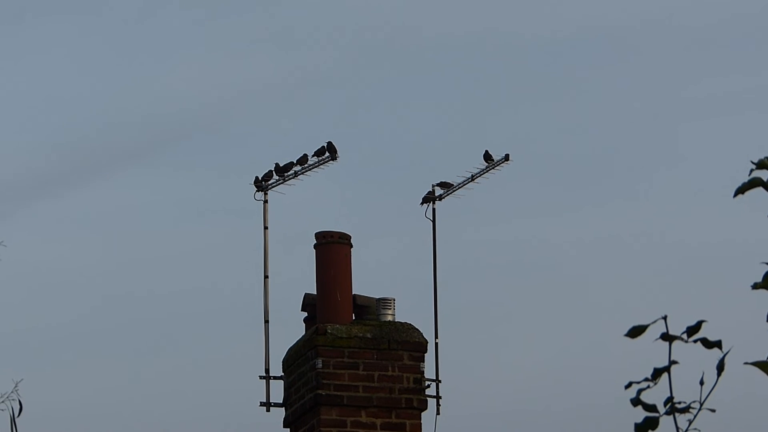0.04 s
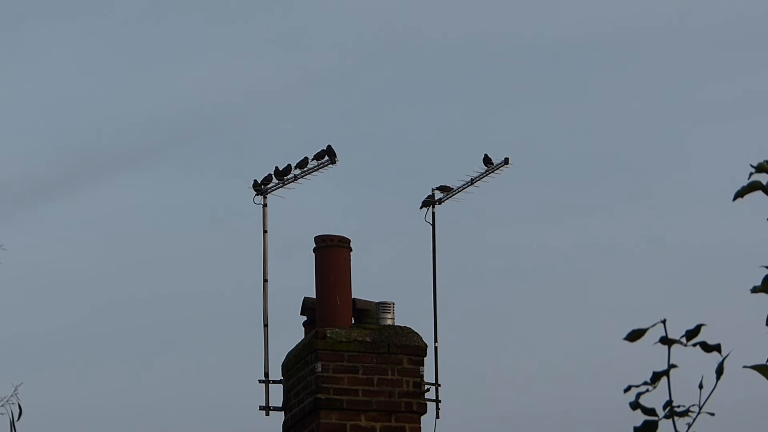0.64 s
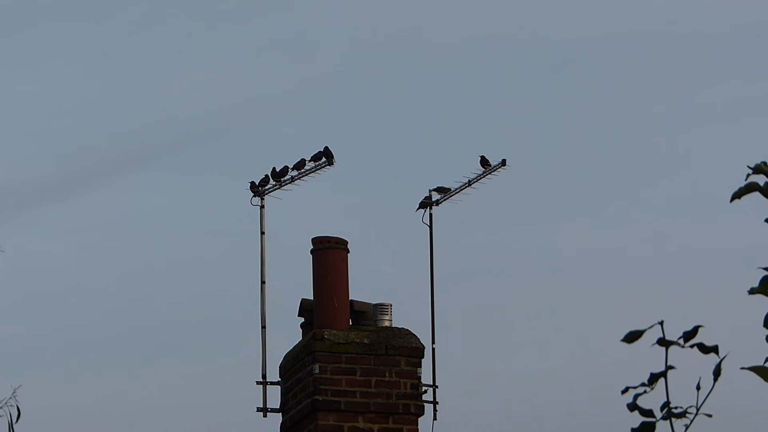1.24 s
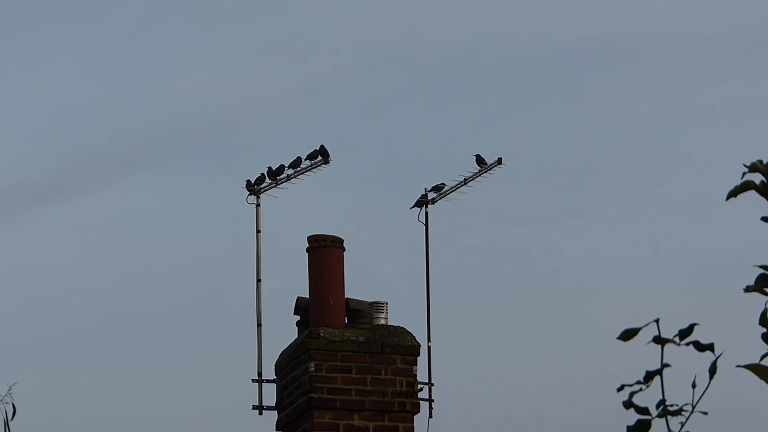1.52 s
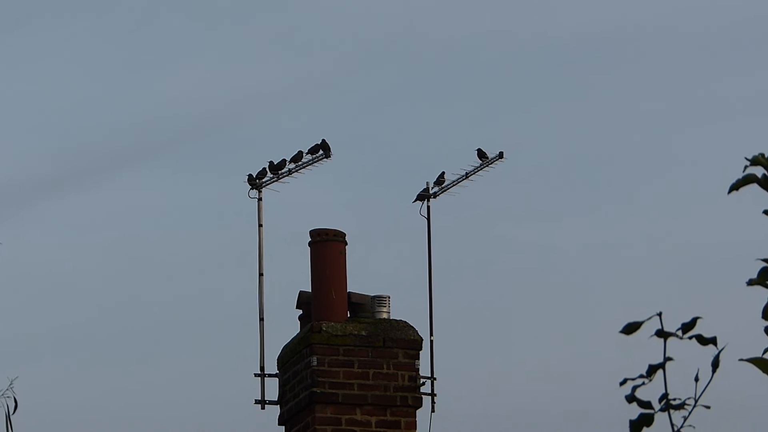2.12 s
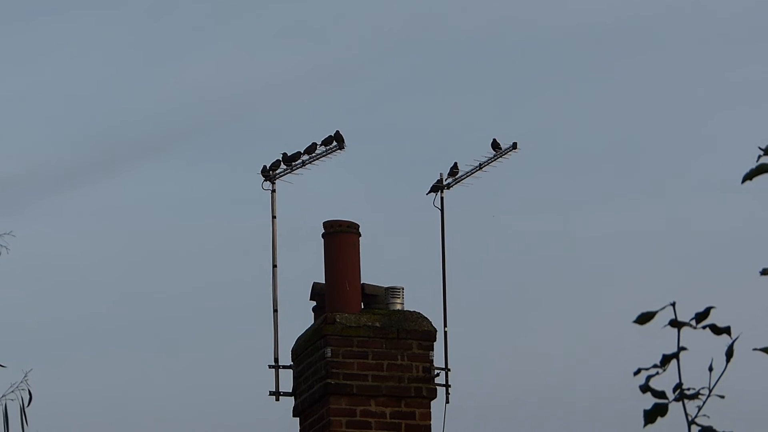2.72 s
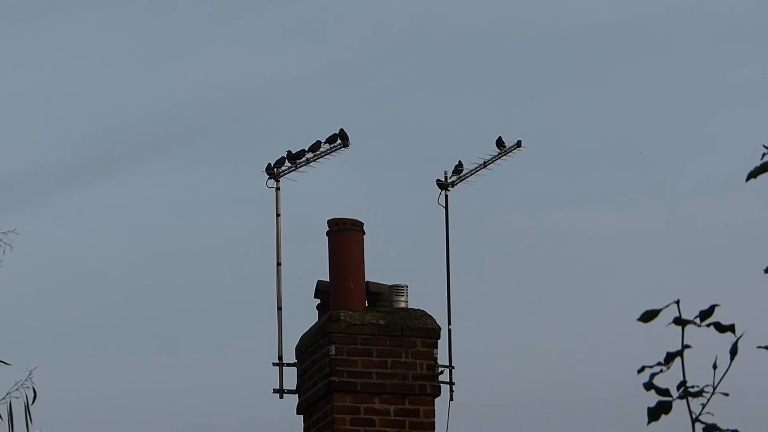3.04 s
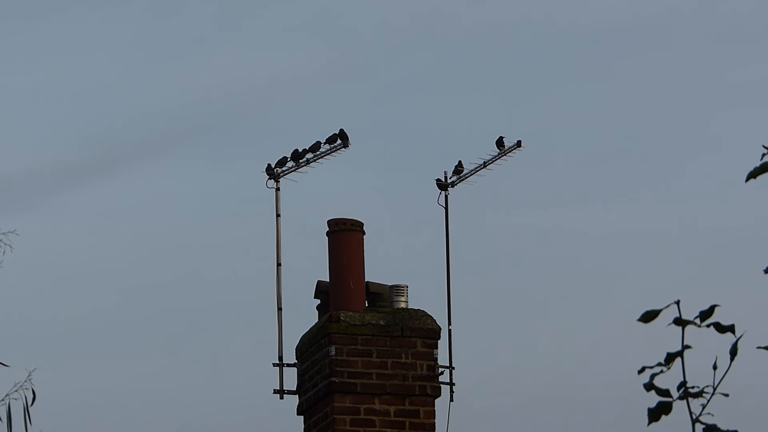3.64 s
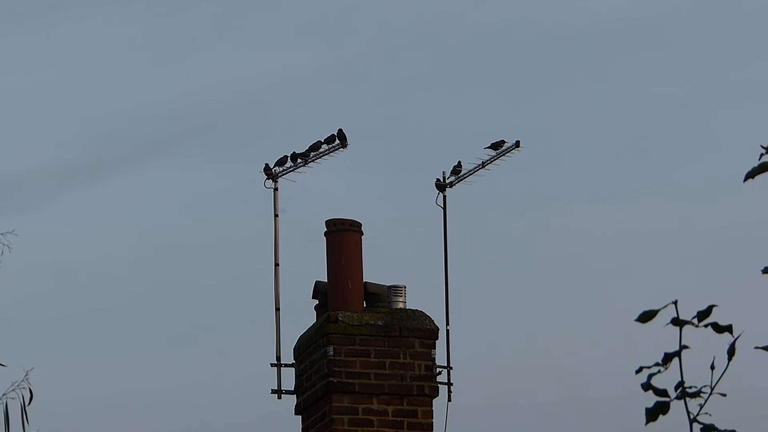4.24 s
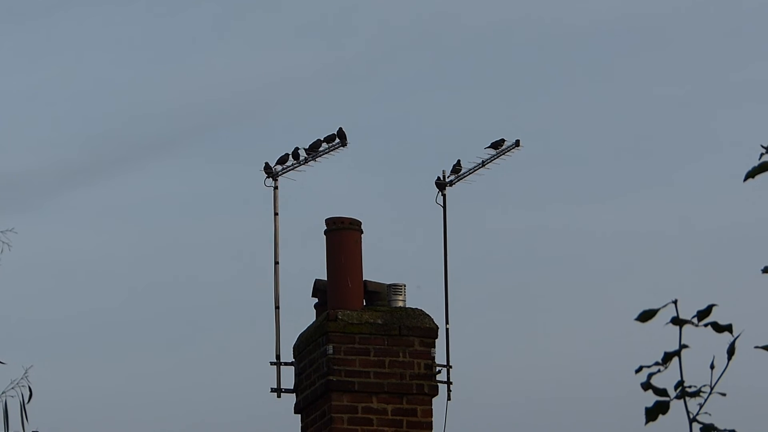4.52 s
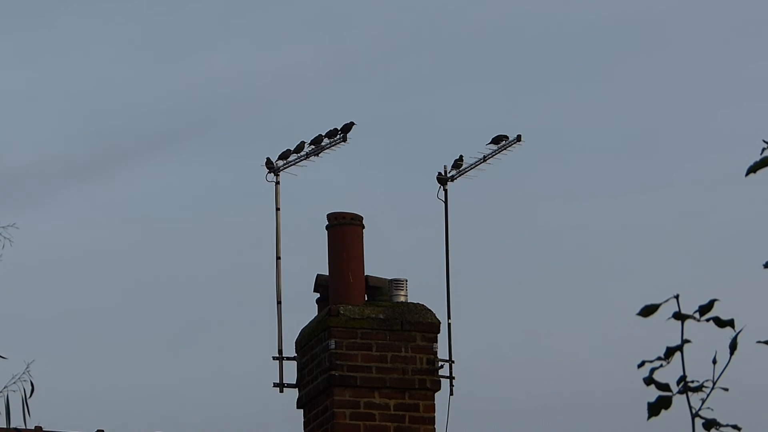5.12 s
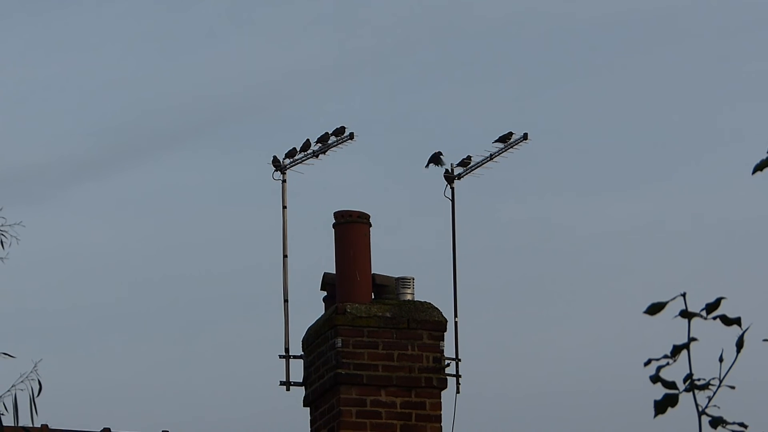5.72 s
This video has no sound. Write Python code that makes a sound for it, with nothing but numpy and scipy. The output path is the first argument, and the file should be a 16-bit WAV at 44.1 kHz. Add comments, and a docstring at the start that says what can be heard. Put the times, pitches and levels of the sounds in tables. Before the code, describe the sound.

Starlings call from a rooftop over a quiet, steady hum of distant traffic, with a soft dull tick about once a second. Around 0.5 seconds comes a quick cluster of thin, high chirps. From 1.1 to 2.2 seconds there are reedy squeaks, a faint hoarse note and a few tiny dry beak clicks, while further birds twitter and answer. At 2.3 seconds a long pure whistle swells and slides down, thinning away by 3 seconds. After another click, short harsh rasps come in an uneven run from 3.5 to 5 seconds. A high buzzy trill stands out at about 4.8 seconds, followed by a lower hoarse call at 5.1. Two more rasps and a fainter trill come between 5.3 and 5.7 seconds. The surrounding houses give the calls a short echo, heard through a small stereo microphone.

```python
"""Starlings on two rooftop aerials give thin chirps, a long falling whistle, buzzy trills and harsh rasps.
Their voice box sings nearly pure notes, or flaps unevenly so that throat and beak ring in a rasp.
Fainter birds answer from further off, and the houses around throw back a short echo.
A distant town hums underneath, with a soft dull tick once a second; a small stereo microphone hears it."""
import sys
import numpy as np
from scipy import signal
from scipy.fft import rfft, irfft
from scipy.io import wavfile
from scipy.ndimage import uniform_filter1d

SR = 44100
rng = np.random.default_rng(int(sys.argv[2]) if len(sys.argv) > 2 else 0)


def digitize_waveform(pressure):
    """Quantize a signal to 16-bit integers and store it at the path in sys.argv[1].

    Rows of a 2-D input are taken as channels; values are limited to [-1, 1].
    """
    field = np.atleast_2d(pressure).T
    bounded = np.clip(field, -1, 1)
    quanta = np.round(bounded * 32767).astype(np.int16)
    wavfile.write(sys.argv[1], SR, quanta)


N = 262836
T = np.arange(N) / SR
FREQS = np.maximum(np.arange(N // 2 + 1) * SR / N, 1)


def from_db(db):
    """Turn decibels into a number to multiply by."""
    return 10 ** (np.asarray(db) / 20)


def unit_power(x):
    """Scale a sound to an average power of 1."""
    return x / np.sqrt(np.mean(x ** 2) + 1e-20)


def over_hz(rows):
    """Fill in a table's columns for every frequency between its rows."""
    hz, *columns = np.transpose(rows)
    return [np.interp(np.log(FREQS), np.log(hz), column) for column in columns]


def colour(x, spectrum):
    """Turn frequencies up or down by a table of (frequency [Hz], gain [dB])."""
    return irfft(rfft(x) * from_db(over_hz(spectrum)[0]), N)


def drift(rate_hz):
    """A random wander of about 1 either way, changing about rate_hz times a second."""
    return unit_power(irfft(rfft(rng.standard_normal(N)) / (1 + (FREQS / rate_hz) ** 4), N))


def wobble(hz, unevenness, drift_hz):
    """A swing between -1 and 1 whose speed wanders around hz."""
    return np.sin(2 * np.pi * np.cumsum(hz * (1 + unevenness * drift(drift_hz))) / SR)


def resonate(x, hz, width_hz):
    """Ring at one pitch; filtering twice shuts out more of the rest."""
    r = np.exp(-np.pi * width_hz / SR)
    section = [(1 - r * r) / 2, 0, (r * r - 1) / 2, 1, -2 * r * np.cos(2 * np.pi * hz / SR), r * r]
    return signal.sosfilt([section, section], x + 1e-18)


def burst(start, length, rise, fall):
    """A loudness shape that swells, holds and dies away (all times in seconds)."""
    swell = (1 + np.tanh(2 * (T - start) / rise)) / 2
    return swell * np.exp(-np.clip((T - start - length) / fall, 0, 20))


def slur(start, length, from_hz, to_hz, bow_hz, db, crescendo_db=0, taper_db=7):
    """Points (time, pitch, level) of a sliding note; bow lifts its middle pitch, taper softens its ends."""
    progress = np.linspace(0, 1, 17)
    arch = 1 - (2 * progress - 1) ** 2
    hz = from_hz + (to_hz - from_hz) * progress + bow_hz * arch
    level_db = db + crescendo_db * (progress - .5) - taper_db * (1 - arch)
    return np.transpose([start + length * progress, hz, level_db])


def sing(notes, octave_db, waver, flutter_db, buzz_hz=170, buzz_depth=0, edge_s=0.004):
    """A bird's voice box makes a tone and its octave; a buzz swings the pitch quickly up and down."""
    swing = wobble(buzz_hz, unevenness=0.11, drift_hz=51.1)
    bend = 1 + waver * drift(262) + buzz_depth * swing
    flutter = flutter_db * drift(55)
    out = np.zeros(N)
    for note in notes:
        times, hz, db = np.transpose(note)
        on = (T > times[0] - edge_s) & (T < times[-1] + edge_s)
        t = T[on]
        phase = 2 * np.pi * np.cumsum(np.interp(t, times, hz) * bend[on]) / SR
        tone = np.sin(phase) + from_db(octave_db) * np.sin(2 * phase)
        inside_s = np.minimum(t - times[0], times[-1] - t)
        fade = np.sin(np.pi / 2 * np.clip(inside_s / (2 * edge_s) + .5, 0, 1)) ** 2
        out[on] += np.sqrt(2) * fade * from_db(np.interp(t, times, db) + flutter[on]) * tone
    return out


def town(gain_db=1.0, hum_hz=201, hum_db=-21):
    """Far traffic with a faint hum, partly different at the two ears."""
    # the traffic's tone colour: (frequency [Hz], relative level [dB])
    spectrum = [(20, -5.5), (45, -7.5), (70, -6.5), (125, -2.5), (250, -2), (370, -4.5), (760, 0.5),
                (1100, -1), (1550, -4.5), (2700, -11), (4500, -14), (7000, -14), (10000, -20),
                (15500, -28.5)]
    # its slow change in loudness: (time [s], level before gain_db [dB])
    loudness = [(0.3, -63.5), (1.7, -62), (5.96, -62.5)]
    # the share that differs between the ears: (frequency [Hz], gain [dB])
    ear_difference = [(30, -14), (80, -12), (250, 0.5), (1000, -4), (3000, -3.5), (6000, -4.5), (14000, -3)]
    mid, side = (unit_power(colour(rng.standard_normal(N), spectrum)) for _ in range(2))
    hum = from_db(hum_db) * unit_power(resonate(rng.standard_normal(N), hum_hz, width_hz=14.0))
    level = from_db(np.interp(T, *np.transpose(loudness)) + gain_db)
    return level * (mid + hum + colour(side, ear_difference) * [[1], [-1]])


def ticks(first_s=.862, every_s=1.0004, level_db=-56.5):
    """A soft, blurred knock of noise that comes once a second."""
    # the knock's tone colour: (frequency [Hz], relative level [dB])
    spectrum = [(300, -19), (700, -6.5), (1150, 3), (1600, -4.5), (2800, -9.5), (6000, -15.5), (12000, -39)]
    knocks = sum(burst(s, length=0.022, rise=0.0053, fall=0.04) for s in np.arange(first_s, T[-1], every_s))
    return from_db(level_db) * knocks * unit_power(colour(rng.standard_normal(N), spectrum))


def rooftops(x, echo_db, decay_s, gap_s=0.0041, stereo_width=0.38):
    """Sound bounces back: many scattered echoes from roofs and two clearer ones from walls."""
    # single echoes from houses: (delay [s], gain [dB])
    walls = [(0.073, -24.5), (0.141, -25)]
    t = T[:SR]
    bounces = rng.standard_normal((2, SR)) * (rng.random((2, SR)) < .06)
    mid, side = bounces * from_db(-60 * t / decay_s) * np.clip(t / gap_s - 1, 0, 1)
    echoes = from_db(echo_db) * (mid + stereo_width * side * [[1], [-1]]) / np.sqrt(np.sum(mid ** 2))
    for delay, db in walls:
        echoes[:, round(delay * SR)] += from_db(db)
    return x + signal.fftconvolve(x[None], echoes, axes=1)[:, :N]


def flock(count=420, note_s=0.0245, pitch_spread=.3, sweep=0.1003, idle_db=-77):
    """The rest of the flock twitters in bouts of short, scratchy notes at chance times and pitches."""
    # bouts of twittering: (start [s], length [s], relative level [dB], middle pitch [Hz])
    bouts = [(0.273, 0.29, -70.5, 4900), (1.019, 0.21, -70, 4330), (1.29, 0.11, -65.5, 3410),
             (2.038, 0.272, -67.5, 4540), (2.78, .15, -65, 5050), (3.1, 0.17, -78, 5410),
             (3.98, 0.15, -64.5, 4300), (5.53, 0.11, -62.5, 4470)]
    start, held, _, middle_hz = np.transpose(bouts)
    notes = []
    for i, (when, pitch, slope, size) in enumerate(rng.random((count, 4))):
        s = (i + when) / count * T[-1]
        hz = np.interp(s, start + held / 2, middle_hz) * np.exp(pitch_spread * (2 * pitch - 1))
        slide = 1 + sweep * (2 * slope - 1)
        half_s = note_s * (size + .5) / 2
        notes.append([(s, hz * slide, -8), (s + half_s, hz, 0), (s + 2 * half_s, hz / slide, -8)])
    twitter = sing(notes, octave_db=-17, waver=0.061, flutter_db=3.5)
    swells = sum(from_db(db) * burst(s, length, rise=.05, fall=0.03) for s, length, db, _ in bouts)
    return unit_power(twitter) * (from_db(idle_db) + swells)


def far_answers():
    """Birds further off answer with faint sliding notes."""
    # far notes: (start [s], length [s], from [Hz], to [Hz], bow [Hz], relative level [dB])
    notes = [(.292, 0.055, 2080, 2244, 3, -63), (.335, .06, 4730, 4660, 0, -72),
             (.40, .025, 6970, 6500, 0, -71), (.485, .045, 4390, 3030, -200, -70.5),
             (1.135, 0.028, 2380, 2500, 60, -66), (1.149, 0.035, 5500, 4550, 0, -63),
             (1.199, 0.023, 6250, 6360, 50, -62.5), (1.207, .04, 4370, 4150, 0, -64.5),
             (1.274, 0.03, 4750, 5050, 170, -62.5), (1.467, .022, 7500, 7040, 0, -67.5),
             (1.611, 0.047, 2060, 2204, 70, -59), (2.114, .014, 3330, 2990, 0, -60.5),
             (2.137, 0.011, 3160, 3470, 0, -62), (3.051, 0.12, 3340, 2920, 0, -71)]
    return sing([slur(*row, taper_db=3) for row in notes], octave_db=-21, waver=0.015, flutter_db=2.5)


def beak_clicks(gain_db=-3, ring_hz=6300, width_hz=4500):
    """The beak snaps shut with a tiny dry click."""
    # snaps of the beak: (time [s], peak before gain_db [dB])
    hits = [(1.5379, -47), (1.6077, -45), (1.746, -48), (2.1826, -43), (3.2101, -46)]
    clicks = np.zeros(N)
    for s, db in hits:
        clicks[round(s * SR)] = from_db(db + gain_db)
    snaps = resonate(clicks, ring_hz, width_hz)
    return snaps * clicks.max() / np.abs(snaps).max()


def hoarse_calls(gain_db=-1.5, throb_hz=60, throb_db=3.0, grit_db=-6):
    """A throbbing, wavering tone with gritty noise that follows its loudness."""
    # calls: (start [s], length [s], from [Hz], to [Hz], bow [Hz], level before gain_db [dB])
    calls = [(1.27, 0.19, 1700, 1750, 0, -71), (1.455, .03, 2600, 2350, 0, -69.5),
             (5.069, .108, 2135, 2643, 580, -59), (5.182, .034, 2420, 2157, 2, -56.5)]
    notes = [slur(*row, taper_db=0.5) for row in calls]
    tone = sing(notes, octave_db=-19, waver=0.045, flutter_db=4.5, buzz_hz=330, buzz_depth=0.061)
    tone *= from_db(throb_db * wobble(throb_hz, unevenness=0.21, drift_hz=31))
    loudness = np.sqrt(uniform_filter1d(tone ** 2, size=200) + 1e-16)
    grit = unit_power(resonate(rng.standard_normal(N), hz=2200, width_hz=1700))
    return from_db(gain_db) * (tone + from_db(grit_db) * loudness * grit)


def squeaks():
    """Short notes made reedy by a strong octave."""
    # squeaks: (start [s], length [s], from [Hz], to [Hz], bow [Hz], level [dB])
    notes = [(1.125, .025, 3620, 4370, 170, -57.5), (2.222, 0.026, 4450, 3620, -40, -48),
             (2.25, .034, 3500, 3380, -40, -61.5)]
    return sing([slur(*row, taper_db=10) for row in notes], octave_db=-12.5, waver=0.031, flutter_db=1.5)


def chirps():
    """Thin, high, almost pure notes, each one quick slide."""
    # chirps: (start [s], length [s], from [Hz], to [Hz], bow [Hz], level [dB])
    notes = [(0.438, 0.02, 7850, 6950, -130, -55.5), (0.48, 0.025, 8350, 7800, -190, -53.5),
             (.521, 0.015, 7130, 7650, -140, -48.5), (0.55, 0.0163, 7650, 6850, 100, -52),
             (.567, 0.027, 6800, 5700, -400, -65), (5.011, .008, 6000, 6950, 0, -48)]
    return sing([slur(*row, taper_db=8.5) for row in notes], octave_db=-36, waver=0.004, flutter_db=2.0)


def trills():
    """High notes whose pitch shakes so fast that they buzz."""
    # trills: (start [s], length [s], from [Hz], to [Hz], bow [Hz], level [dB], growth in level [dB])
    calls = [(4.78, .085, 8100, 7780, -84, -51, 6), (4.865, .107, 7550, 6940, 22, -43, 1),
             (5.524, 0.14, 7940, 7020, 231, -59.5, -2)]
    notes = [slur(*row, taper_db=4.5) for row in calls]
    return sing(notes, octave_db=-51, waver=0.011, flutter_db=1.0, buzz_hz=196.5, buzz_depth=0.034)


def whistle(peak_s=2.468, peak_db=-45.5, swell_db_per_s=42, fade_db_per_s=39):
    """A long pure note swells and fades as it sinks, then drops to a thin thread of sound."""
    # the pitch scoops up, then sinks: (time [s], pitch [Hz])
    pitch_path = [(2.277, 5630), (2.297, 6200), (2.313, 6340), (2.353, 5940), (2.393, 5770), (2.448, 5125),
                  (2.50, 4916), (2.61, 4370), (2.696, 4124)]
    times = np.arange(pitch_path[0][0], pitch_path[-1][0], .002)
    hz = np.interp(times, *np.transpose(pitch_path))
    past_peak_s = times - peak_s
    db = peak_db + np.minimum(swell_db_per_s * past_peak_s, -fade_db_per_s * past_peak_s)
    db -= 8 * np.exp(-(times - times[0]) / 0.013)   # it starts softly
    thread = slur(times[-1], length=.25, from_hz=hz[-1], to_hz=3670, bow_hz=-89.5,
                  db=-69, crescendo_db=-2, taper_db=1)
    return sing([np.transpose([times, hz, db]), thread], octave_db=-27.5, waver=0.0051, flutter_db=3.5)


def rasps(jitter=.032, sag_per_s=3.4, hiss_db=3, flap_hz=200, flap_db=1.0, beak_db=5.0, rise_s=.010):
    """The voice box flaps unevenly, making a rough tone that sags in pitch and rings in the throat."""
    # rasps: (start [s], length [s], level [dB], high ringing compared with middle ringing [dB])
    calls = [(3.539, .017, -53.5, 6.5), (3.560, 0.053, -54, -2), (3.654, .017, -50, 1.5),
             (3.782, .008, -52.5, -2), (3.794, .012, -45.5, -4), (3.813, 0.045, -56, -4.5),
             (3.927, .021, -51.5, 1.5), (4.089, 0.014, -59.5, 0), (4.272, .046, -57.5, 1.5),
             (4.330, .018, -53, 9.5), (4.536, .024, -51.5, 5), (4.563, .016, -51.5, 12),
             (4.579, .021, -48.5, -7), (4.648, .02, -59, -12), (4.710, .019, -44, -1),
             (4.729, .043, -53, 5.5), (4.875, .018, -59.5, -5), (4.936, 0.023, -50.5, 7.5),
             (5.333, .035, -50.5, 2.5), (5.665, .033, -50.5, 7)]
    # ringing of throat and beak in low, middle and high groups: (pitch [Hz], width [Hz], weight [dB])
    throat = [
        [(2524, 1370, 0)],
        [(4310, 450, -0.5), (4860, 860, 4)],
        [(6150, 1060, 10), (7220, 1350, 7), (9100, 7100, -21.5)],
    ]
    start, length, level_db, bright_db = np.transpose(calls)
    current = np.maximum(np.searchsorted(start, T + rise_s / 2) - 1, 0)
    age_s = np.clip(T - start[current], 0, .1)
    start_hz = 1150.6 + 5200 * length   # longer rasps start higher
    pitch_hz = start_hz[current] * np.exp(jitter * drift(110.0) - sag_per_s * age_s)
    phase = 2 * np.pi * np.cumsum(pitch_hz) / SR
    tone = unit_power(sum(np.cos(k * phase) for k in range(1, 13)))
    hiss = unit_power(rng.standard_normal(N) * (1 + np.cos(phase)))
    flaps = from_db(flap_db * wobble(flap_hz, unevenness=.3, drift_hz=80.4))
    source = (tone + from_db(hiss_db) * hiss) * flaps
    power_shapes = np.array([burst(s, held, rise_s, fall=0.0076) ** 2 for s, held in zip(start, length)])
    effort_db = level_db + np.maximum(bright_db, 0)
    low_db = -56.5 + 0.34 * (effort_db - effort_db.mean())   # the low ringing only partly follows effort
    out = np.zeros(N)
    for group, group_db in zip(throat, (low_db, level_db, level_db + bright_db)):
        # the moving beak favours now one ringing pitch, now another
        voice = sum(from_db(db + beak_db * drift(55)) * resonate(source, hz, width)
                    for hz, width, db in group)
        voice /= np.sqrt(uniform_filter1d(voice ** 2, size=500) + 1e-12)   # even out the loudness
        out += voice * np.sqrt(from_db(group_db) ** 2 @ power_shapes)
    return out


def scene():
    """Near and far birds echo off the houses, over the ticks and the town."""
    # treble lost on the way through the air: (frequency [Hz], gain [dB])
    air = [(9000, 0), (12000, -3.5), (15500, -30)]
    near = chirps() + squeaks() + trills() + whistle() + hoarse_calls() + rasps() + beak_clicks()
    far = from_db(-0.5) * far_answers() + from_db(-5) * flock()
    birds = rooftops(near, echo_db=-7.5, decay_s=0.3) + rooftops(far, echo_db=-2.5, decay_s=0.25)
    return colour(birds, air) + ticks() + town()


def record(dry, offset=-.003, cutoff_hz=15650):
    """Two close microphones are widened into stereo; the recorder cuts the top and adds a steady offset."""
    # left-right difference: (frequency [Hz], level compared with the centre [dB], lag [radians])
    microphone_pair = [(25, -8, 0.61), (59, -14, 0.77), (126, -2, 0.44), (292, 11.5, 0.95),
                       (710, 6.5, 1.55), (1330, 0.5, 1.59), (2780, -5.5, 1.5), (5600, -10, 1.4),
                       (12000, -11, 1.5)]
    side_db, lag = over_hz(microphone_pair)
    side = rfft(dry.mean(axis=0)) * from_db(side_db) * np.exp(-1j * lag)
    treble_cut = 1 / np.sqrt(1 + (FREQS / cutoff_hz) ** 300)
    return irfft((rfft(dry) + side * [[1], [-1]]) * treble_cut, N) + offset


dry = scene()
out = record(dry)
digitize_waveform(out)
```